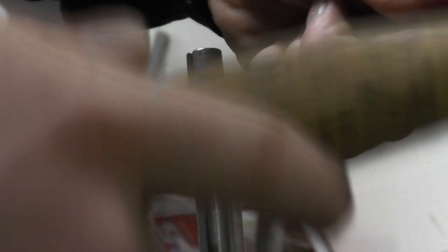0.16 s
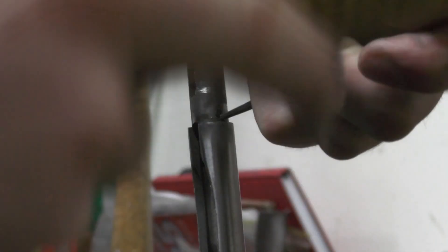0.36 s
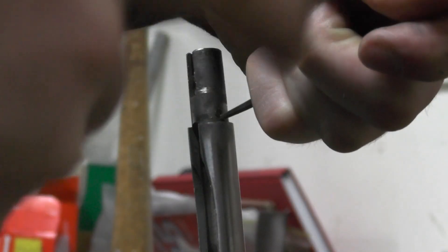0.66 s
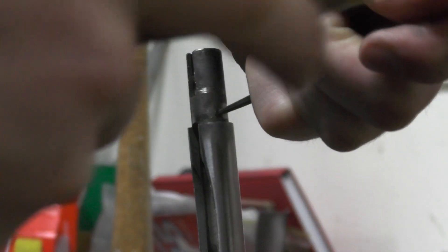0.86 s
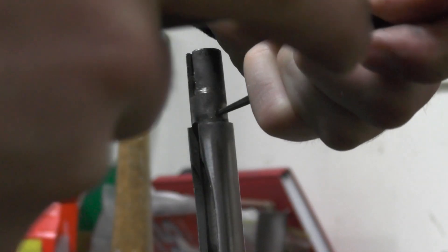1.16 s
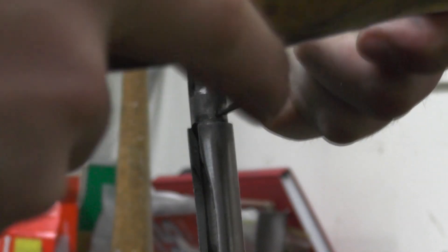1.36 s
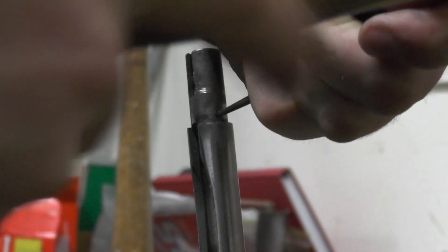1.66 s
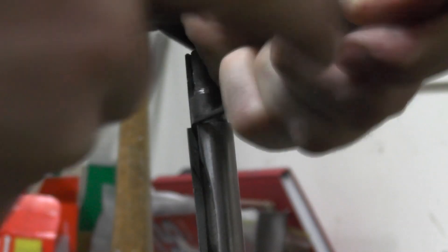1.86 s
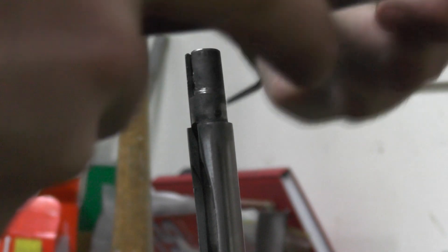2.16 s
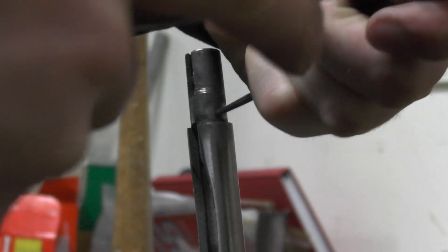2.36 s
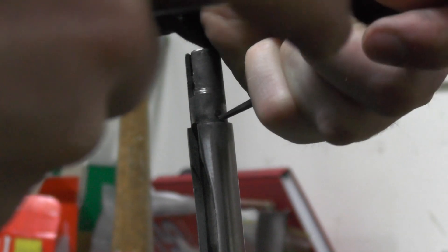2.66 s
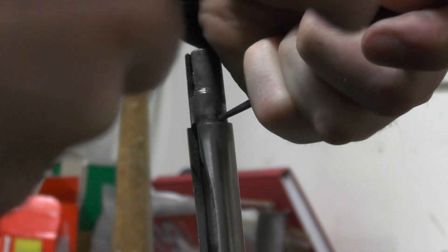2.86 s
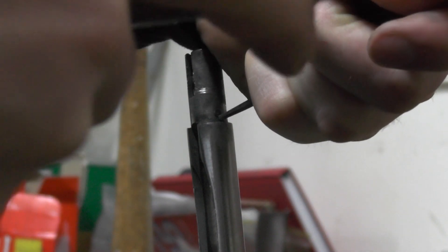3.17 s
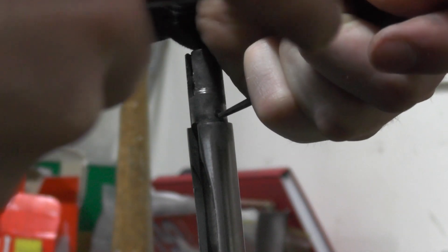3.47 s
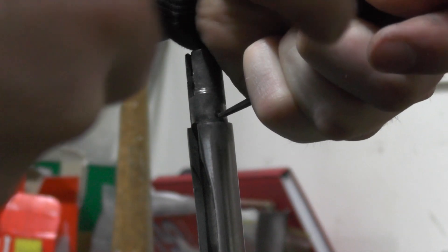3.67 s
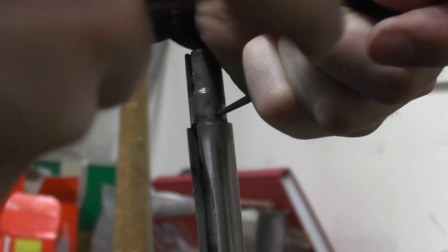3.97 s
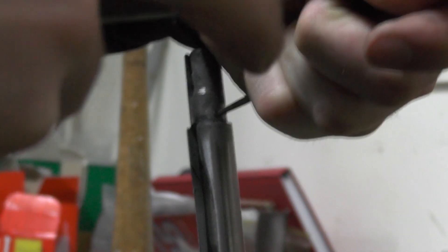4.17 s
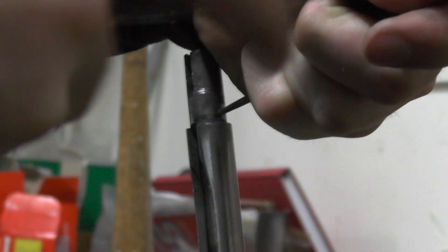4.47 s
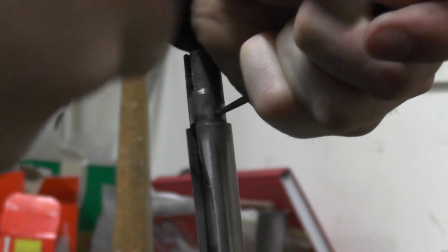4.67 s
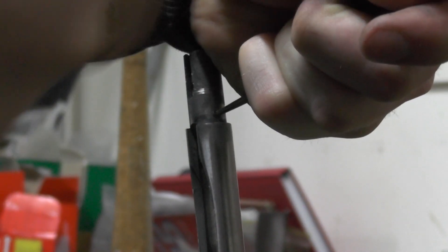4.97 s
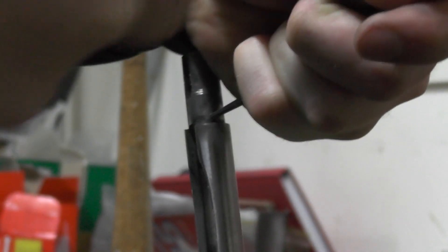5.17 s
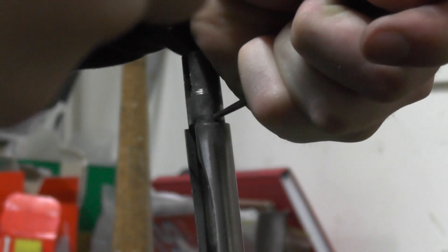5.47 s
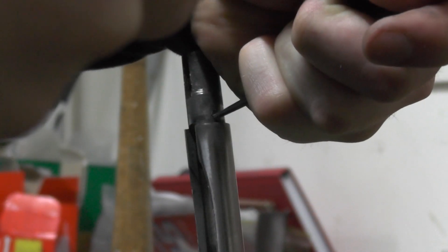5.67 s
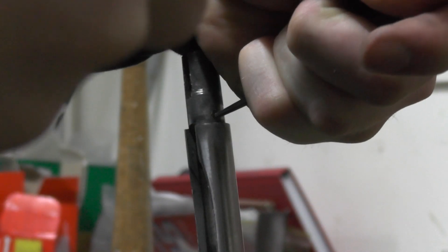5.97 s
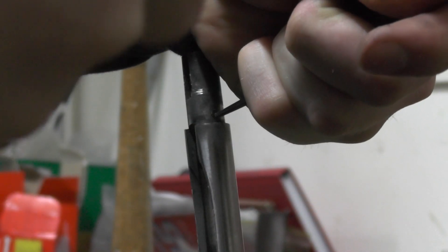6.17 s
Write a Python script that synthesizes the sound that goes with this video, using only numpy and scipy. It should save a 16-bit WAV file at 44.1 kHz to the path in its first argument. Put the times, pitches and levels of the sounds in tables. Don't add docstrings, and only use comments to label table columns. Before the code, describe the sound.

In a small workshop, a loose steel tool chatters and rings thinly on the bench before being gripped silent. Three hammer blows on a punch follow, each a bright crack with dull bench thump and clinking rebounds. Wood squeaks and knocks in a pause, then four more blows land, the last glancing. A close camera microphone also catches low machine drone, rumble and hiss.

```python
import sys
import numpy as np
from scipy import signal
from scipy.fft import rfft, irfft
from scipy.io import wavfile
from scipy.ndimage import uniform_filter1d

SR = 44100
rng = np.random.default_rng(int(sys.argv[2]) if len(sys.argv) > 2 else 0)


def transcribe(u):
    v = np.clip(np.atleast_2d(u).T, -1, 1)
    q = np.round(v * 32767).astype(np.int16)
    wavfile.write(sys.argv[1], SR, q)


def gain_from_db(level_db):
    decades = np.asarray(level_db, float) / 20
    return 10 ** decades


N = 278712


def evened(x):
    return x / np.sqrt(np.mean(x ** 2) + 1e-20)


def smoothed(x, size):
    return uniform_filter1d(x, size=size)


def read(points, hz, column=1):
    rows = np.transpose(points)
    return np.interp(np.log(hz + 1), np.log(rows[0] + 1), rows[column])


def add(mix, s, sound):
    part = mix[..., round(s * SR):][..., :sound.shape[-1]]
    part += sound[..., :part.shape[-1]]


def coloured(x, points):
    hz = np.fft.rfftfreq(x.shape[-1], 1 / SR)
    return irfft(rfft(x) * gain_from_db(read(points, hz)), x.shape[-1])


def noise_burst(t):
    return rng.standard_normal((2, len(t)))


def ring(modes, t, phase):
    hz, db, t60 = np.reshape(modes, (-1, 3)).T[:, :, None]
    size = gain_from_db(db - 60 * t / t60) * (1 - np.exp(-t * hz * 1.3))
    return (size * np.sin(2 * np.pi * hz * t + phase)).sum(0)


def varied(modes, spread_db, detune):
    hz, db, t60 = np.transpose(modes)
    a, b = rng.standard_normal((2, len(hz)))
    return np.transpose([hz * (1 + detune * a), db + spread_db * b, t60])


def fuzzy(hz, width):
    f = np.fft.rfftfreq(N, 1 / SR)
    resonance = 1 / (1 + ((f - hz) / (width / 2)) ** 2)
    return evened(irfft(rfft(rng.standard_normal((2, N))) * resonance, N))


def ports(paths, table):
    hz = np.fft.rfftfreq(N, 1 / SR)
    db, turn, same = (read(table, hz, column=k) for k in range(1, 4))
    same = np.clip(same, 0, 1)
    right, other = rfft(paths)
    left = gain_from_db(db) * (same * np.exp(1j * turn) * right + np.sqrt(1 - same ** 2) * other)
    return np.array([irfft(left, N), paths[0]])


BLOW_TIMES = [
    .799,
    1.4342,
    1.7957,
    3.8716,
    4.2235,
    4.5688,
    5.0929,
]


def after_blows(t, fade_s):
    since = t - np.array(BLOW_TIMES)[:, None]
    return (np.exp(-np.maximum(since, 0) / fade_s) * (since > 0)).max(0)


# (start [s], end [s], level [dB], pitch [Hz])
MACHINE_SWELLS = [
    (0.062, 1.085, -52.5, 67.5),
    (1.403, 1.982, -56.5, 66.7),
    (2.2, 2.7, -60.5, 66.14),
    (2.8, 3.017, -62.5, 66.6),
    (3.116, 4.05, -57, 65.57),
    (4.443, 4.702, -58.5, 65.4),
    (4.676, 5.12, -51, 62.7),
    (5.448, 5.874, -59, 62.7),
    (6.0, 6.4, -67, 64.6),
]
SWELL_EDGE_S, IDLE_DB = 0.088, -71.5


def drone(t):
    start, end, db, hz = np.transpose(MACHINE_SWELLS)[:, :, None]
    shape = np.clip(np.minimum(t - start, end - t) / SWELL_EDGE_S, 0, 1)
    middle = (start + end) / 2
    wander_hz = 0.56 * evened(smoothed(rng.standard_normal(N), 9000))
    pitch_hz = np.interp(t, middle[:, 0], hz[:, 0]) + wander_hz
    size = gain_from_db(IDLE_DB) + (gain_from_db(db) * shape).max(0)
    return gain_from_db(3.5) * size * np.sin(2 * np.pi * np.cumsum(pitch_hz) / SR)


# (frequency [Hz], density [dB per Hz])
AIR_SPECTRUM = [(12, -72.5), (20, -27), (48, -9), (65, -6), (134, -8), (163, -19.5), (277, -17),
                (542, -20.5), (802, -23.5), (1290, -28), (1570, -25.5), (1810, -42.5), (2910, -23.5),
                (5230, -39.5), (16000, -29)]
# (frequency [Hz], width [Hz], level [dB])
MACHINE_ORDERS = [(66.6, 9, -13.5), (106, 12, -10), (124, 22, -8), (195.7, 12, -11)]
# (frequency [Hz], width [Hz], level [dB])
CAMERA_WHIR = [(1566, 310, -69), (2010, 130, -73.5), (3170, 3100, -65.5)]
# (frequency [Hz], level [dB])
BUZZ_LINES = [(1373, -86), (1523, -86.5), (1577, -77), (1723, -92), (1927, -83), (2945, -84.5), (3025, -82),
              (3176, -83), (3225, -86), (3273, -91), (3575, -85.5), (4576, -88), (4732, -91)]
DUCK_DB, DUCK_RECOVER_S, STAY_DB = -3.5, 0.14, -3.5
BOOM_DB, BOOM_S = 6, 0.18


def room():
    t = np.arange(N) / SR
    air = evened(coloured(rng.standard_normal((2, N)), AIR_SPECTRUM))
    air = coloured(air, [(15900, 0), (16100, -50)])
    low = coloured(air, [(900, -2.0), (2500, -38.0)])
    deep = coloured(air, [(140, -17.5), (220, -42.0)])
    hiss = air - low
    gain = gain_from_db(DUCK_DB * after_blows(t, DUCK_RECOVER_S) + STAY_DB * (t > BLOW_TIMES[-1]))
    boom = gain_from_db(BOOM_DB * after_blows(t, BOOM_S))
    out = gain_from_db(-55) * (hiss * gain + deep + (low - deep) * gain * boom)
    out += gain_from_db(-61) * sum(gain_from_db(db) * fuzzy(hz, width) for hz, width, db in MACHINE_ORDERS)
    out += drone(t)
    out += gain * sum(gain_from_db(db) * fuzzy(hz, width) for hz, width, db in CAMERA_WHIR)
    return out + gain * sum(gain_from_db(db + 4.5) * fuzzy(hz, 6.3) for hz, db in BUZZ_LINES)


# (start [s], end [s], level [dB], pitch [Hz], width [Hz])
NARROW_NOISES = [
    (0, 0.16, -61, 1200, 120),
    (1.89, 2.02, -51.5, 1290, 130),
    (2.021, 2.13, -57, 1360, 99),
    (2.36, 2.434, -58, 1280, 170),
    (2.535, 2.632, -58, 1180, 220),
    (2.345, 2.41, -59, 700, 270),
    (0, .78, -66, 720, 440),
    (3.68, 3.87, -60, 550, 250),
    (5.2, 5.6, -63, 530, 500),
    (5.5, 6, -67, 325, 250),
]


def narrow_noises():
    out = np.zeros((2, N))
    for start, end, db, hz, width in NARROW_NOISES:
        count = round((end - start) * SR)
        squeak = fuzzy(hz, width)[:, :count] * signal.windows.tukey(count, .4)
        add(out, max(start, 0), gain_from_db(db) * squeak)
    return out


# (time [s], peak level [dB], pitch [Hz], t60 [s], dull share [0-1])
WOOD_KNOCKS = [(0.0005, -51, 1234, 0.2, 0.18), (0.0465, -43, 1330, 0.05, 0.2),
               (0.0557, -46, 1307, 0.05, 0.15), (0.1157, -57, 1220, 0.05, 0.5),
               (0.1278, -51, 1360, 0.05, 0.3), (1.8885, -35, 1270, 0.07, 0.1),
               (1.9035, -41, 1420, 0.04, 0.1), (1.916, -37, 1280, 0.06, 0.1), (1.937, -37, 1290, 0.09, 0.1),
               (1.997, -51, 1360, 0.06, 0), (2.0305, -43.5, 1240, 0.1, 0.1), (2.046, -47, 1220, 0.06, 0.1),
               (2.0724, -48, 1330, 0.05, 0), (2.082, -47, 1360, 0.05, 0), (2.105, -51, 1400, 0.06, 0),
               (2.1665, -49, 950, 0.014, 0.9), (2.3405, -40, 1000, 0.06, 0.7),
               (2.342, -35, 1300, 0.05, 0.11), (2.35, -39, 1290, 0.06, 0.1), (2.358, -44, 1300, 0.1, 0.1),
               (2.5535, -47, 1270, 0.04, 0.02), (2.564, -52, 1250, 0.04, 0), (2.582, -53, 1020, 0.06, 0.4),
               (3.1476, -59, 1300, 0.06, 0.5), (3.3274, -54, 1300, 0.05, 0.08)]
WOOD_PARTNERS = (1.08, .9)


def knocks():
    t, out = np.arange(8000) / SR, np.zeros((2, N))
    for s, db, hz, t60, dull in WOOD_KNOCKS:
        noise, slips = rng.standard_normal((2, 2, len(t)))
        upper, lower = WOOD_PARTNERS
        modes = [(hz, 0, .06), (hz * upper, -5, .04), (hz * lower, -7, .04)]
        slips = slips * gain_from_db(-60 * t / t60)
        slips[:, 0] = 16
        creak = signal.fftconvolve(slips, ring(modes, t[:3000], 0)[None], axes=1)[:, :len(t)]
        creak = creak * (1 - np.exp(-t / 0.00067))
        puff = evened(coloured(noise, [(250, -36), (600, 7.5), (1400, -2), (2000, -20), (4000, -14.5), (6000, -36)]))
        puff = np.clip(dull, 0, 1) * puff * gain_from_db(-60 * t / (1.8 * t60))
        add(out, s, gain_from_db(db + 3.5) * (creak / abs(creak).max() + puff))
    return out


# (drift [dB per s], edge-on dip [dB], jolt at first blow [dB])
TOOL_CARRY = [
    (21, 3.5, -3),
    (-6.5, -14.5, 0),
    (-70.5, -7, 1),
]
TURN_S, TURN_WIDTH_S = 0.831, 0.084
GRIP_S, GRIP_DB_PER_S = 1.125, -110


def carried(t, last_s, drift_db, dip_db, jolt_db):
    drift = drift_db * np.maximum(t - last_s, 0)
    turn = dip_db * np.exp(-((t - TURN_S) / TURN_WIDTH_S) ** 2)
    grip = GRIP_DB_PER_S * np.maximum(t - GRIP_S, 0)
    return drift + turn + jolt_db * (t > BLOW_TIMES[0]) + grip


# (pitch [Hz], partner offset [Hz], partner level [dB], t60 between touches [s])
TOOL_MODES = [(2259, 22, -15, 1.5), (5606, 17, -20, 1.2), (9921, 26, -2, .5)]
# (time [s], click level [dB], ring level of low, middle, high mode afterwards [dB])
TOOL_TOUCHES = [(0.1907, -41.5, -45, -37.5, -54.5), (0.2171, -43, -35.5, -33.5, -58),
                (0.238, -58, -36.5, -38.5, -54.5), (0.2549, -49.5, -39, -34, -50),
                (0.271, -54, -47, -39.5, -63), (0.2808, -52.5, -56, -34, -63),
                (0.3012, -48, -45, -27.5, -60), (0.33, -46, -42.5, -27.5, -59),
                (0.3847, -45, -47, -37.5, -53), (0.4045, -54, -51, -41, -57),
                (0.445, -46.5, -48, -30, -50.5)]
# (pitch [Hz], level [dB], t60 [s])
TOUCH_ANSWER = [(3610, 2.5, 0.016), (4400, -6, 0.01), (2920, -10, .012)]
# (frequency [Hz], level [dB])
CLICK_SPECTRUM = [(600, -10.5), (1500, -3.5), (2700, -5), (3600, -6.5), (4600, -13), (5600, 7.5),
                  (7000, -8.5), (8000, -24), (12000, -33), (14000, -44)]
BEAT_LAG_S = .0135
CLICK_LAG_S = .003


def loose_tool():
    t = np.arange(round(1.4 * SR)) / SR
    s, click_db, *level_db = np.transpose(TOOL_TOUCHES)
    last = np.maximum(np.searchsorted(s, t) - 1, 0)
    out = np.zeros((2, N))
    for k, (hz, offset_hz, partner_db, t60) in enumerate(TOOL_MODES):
        ring_db = level_db[k][last] - 60 * (t - s[last]) / t60
        size = gain_from_db(ring_db + carried(t, s[-1], *TOOL_CARRY[k])) * (t > s[0])
        size = uniform_filter1d(size, size=300, origin=149)
        main = np.sin(2 * np.pi * hz * t)
        partner = np.sin(2 * np.pi * (hz * t + offset_hz * (t - BEAT_LAG_S)))
        partner_size = gain_from_db(partner_db - 170 * np.maximum(t - s[-2], 0))
        add(out, 0, gain_from_db(4.5) * size * (main + partner_size * partner))
    u = t[:4000]
    for at, db in zip(s, click_db):
        grit = evened(smoothed(rng.standard_normal(len(u)), 70))
        tick = evened(coloured(noise_burst(u), CLICK_SPECTRUM))
        fade = gain_from_db(-60 * u / 0.021) + gain_from_db(-9.5 - 60 * u / 0.32 + 4.6 * grit)
        add(out, at + CLICK_LAG_S, gain_from_db(db + 3) * ring(varied(TOUCH_ANSWER, 2.8, 0.037), u, 0))
        add(out, at + CLICK_LAG_S, gain_from_db(db + 7) * tick * fade)
    return out


# (time [s], level [dB], pitch [Hz], t60 [s])
CLINKS = [(0.7987, -19, 4270, 0.02), (0.8024, -17.5, 7340, 0.015), (0.8087, -22.5, 1980, 0.027),
          (0.8109, -31.5, 11910, 0.02), (0.8114, -23, 3340, 0.02), (0.8147, -22.5, 2900, 0.018),
          (0.8287, -38, 9400, 0.02), (1.4348, -18, 7030, 0.023), (1.4347, -3.5, 4700, 0.0086),
          (1.4424, -13.5, 3720, 0.024), (1.4427, -8, 2710, 0.015), (1.4447, -22, 14400, 0.02),
          (1.4527, -39, 11390, 0.02), (1.4639, -21, 1950, 0.02), (1.7956, -13.5, 4610, 0.015),
          (1.7988, -13, 7110, 0.018), (1.803, -18.5, 3040, 0.02), (1.8072, -19, 3270, 0.024),
          (1.8082, -18, 2540, 0.025), (1.8103, -27, 10700, 0.022), (1.8194, -35, 10400, 0.022),
          (3.871, -22.5, 3640, 0.017), (3.8737, -15, 7340, 0.0202), (3.88, -18, 3680, 0.015),
          (3.88, -21, 3270, 0.02), (3.8834, -19, 1830, 0.041), (3.8875, -33, 10420, 0.02),
          (3.8915, -37.5, 10400, 0.02), (4.2266, -15, 7110, 0.02), (4.2317, -27, 3640, 0.015),
          (4.2328, -12, 2865, 0.025), (4.2359, -18.5, 2530, 0.024), (4.2345, -26, 11580, 0.02),
          (4.2375, -18, 3770, 0.01957), (4.2408, -30, 11950, 0.02), (4.5738, -27.5, 7800, 0.014),
          (4.5776, -15, 3740, 0.02), (4.578, -27, 10650, 0.016), (4.5817, -15, 3870, 0.015),
          (4.5822, -15, 2960, 0.018), (4.584, -20.5, 2400, 0.0198), (4.5968, -28, 10470, 0.02),
          (5.0931, -27, 7800, 0.018), (5.0933, -18, 3490, 0.016), (5.1019, -17.5, 3230, 0.025),
          (5.1021, -26, 10800, 0.018), (5.1029, -22, 3730, 0.016), (5.111, -17, 2650, 0.02),
          (5.1193, -27, 10800, 0.02)]


def clinks():
    t, out = np.arange(4000) / SR, np.zeros((2, N))
    for s, db, hz, t60 in CLINKS:
        pair = [(hz, db, t60), (hz * rng.uniform(1.04, 1.12), db + 1.5, 0.57 * t60)]
        clink = np.array([ring(pair, t, rng.uniform(0, 2 * np.pi, (2, 1))) for path in out])
        add(out, s, clink * (1 - np.exp(-t / 0.0004)))
    return out


# (frequency [Hz], level [dB])
BODY_SPECTRUM = [(18, -41), (30, -17), (113, -20), (185, -11.5), (230, -7), (300, -10.5), (526, -10),
                 (686, -7), (995, -15.5), (1330, -7.5), (2150, -18.5), (2330, -14.5), (3750, -18),
                 (6370, -24), (10800, -25), (15300, -26.5), (16000, -46.5), (17000, -66.5)]
# (frequency [Hz], rise [ms], first t60 [s], room t60 [s], room level [dB], lumpiness [dB])
BODY_FADE = [(49.7, 13.5, 0.3, 1.9, -8, 11), (186.5, 17, 0.38, 0.54, -7.5, 10),
             (500, 1, 0.23, 0.86, -18, -11), (1020, 1.7, 0.19, 0.55, -17.5, 4.5),
             (3520, 0.53, 0.2, 0.41, -16.5, 3), (7700, .8, 0.051, 0.21, -3, 4),
             (14800, 2.1, 0.077, .2, -14, 10)]
CLUMP_DB = 1.1
PATCH_DB, PATCH_FROM_HZ = 2.5, 900


def dense(noise, lumps, t, bright_db):
    hz = np.fft.rfftfreq(len(t), 1 / SR)
    z = rfft(evened(coloured(noise, BODY_SPECTRUM)))
    clumps = evened(smoothed(smoothed(rfft(noise[1]).real, 200), 200))
    tilt_db = bright_db * np.log2((hz + 200) / 1500) / 3
    z = z * gain_from_db(tilt_db + CLUMP_DB * clumps * (hz > 900))
    centres = np.geomspace(40, 16000, num=16)
    out = 0
    for k, f in enumerate(centres):
        share = np.interp(np.log(hz + 1), np.log(centres), np.arange(len(centres)) == k)
        band = irfft(z * share, len(t))
        rise_ms, first, late, room_db, lump_db = (read(BODY_FADE, f, column=c) for c in range(1, 6))
        patch = evened(smoothed(smoothed(np.roll(noise[1], 997 * k), 120), 120))
        band = band * gain_from_db(PATCH_DB * np.clip(patch, -2, 2) * (f > PATCH_FROM_HZ))
        rise = 1 - np.exp(-(t * 1000 / rise_ms) ** 2)
        direct = gain_from_db(lump_db * lumps - 60 * t / first)
        out = out + band * rise * (direct + gain_from_db(room_db - 60 * t / late))
    return out


LANDING_MODES = [228, 275, 335, 452, 559, 684]
LANDING_LEVELS = [(-3, 1, 2.5, -8.5, 0.5, 1), (-5, -3.5, 1.5, 9.5, 5, -2), (-4, 4, -1, 1.5, 2, -2),
                  (2.5, 3.5, 1.5, 1, -3.5, -5.5), (-9, 2, -2, 10, 3, -3.5), (-5, 3, -3.5, -1.5, 3, -1.5),
                  (4, -6.5, -15, 2, -6, -0.5)]


def landed(modes, k):
    shift = dict(zip(LANDING_MODES, LANDING_LEVELS[k]))
    woken = [(hz, db + shift.get(hz, 0), t60) for hz, db, t60 in modes]
    return varied(woken, .5, .005)


# (strength [dB], then against a usual blow: bench thump [dB], steel clatter [dB], brightness [dB])
BLOW_LEVELS = [
    (-8, 0.5, -5, -2.5),
    (-7.5, 1, 2, 0),
    (-5.5, -1.5, -4, 1),
    (-8, 0, 5.5, -2),
    (-8, 1.5, 6, 1),
    (-6, 0, 3, 0.5),
    (-7, -9, -6.5, 2),
]
# (frequency [Hz], level [dB], t60 [s])
BENCH_MODES = [(181, -6, .13), (335, -6, .06), (386, -8, .07), (452, -2, .033), (559, -1, .026),
               (684, -6, .1), (752, -18, .084)]
# (frequency [Hz], level [dB], t60 [s])
BENCH_OPPOSED = [(169, -14, .083), (228, -3, .04), (275, -13, .19)]
# (frequency [Hz], level [dB], t60 [s])
VICE_MODES = [(110.6, -23.5, 0.24), (1190, -38, 0.12), (1300, -14, 0.051), (1379, -12, 0.097),
              (1474, -16, 0.075), (1752, -19, 0.16)]
VICE_FIRST_DB, VICE_DB_PER_BLOW = 1.2, -0.12
VICE_WITH_THUMP = 0.63
# (frequency [Hz], level [dB], t60 [s])
STEEL_MODES = [(1887, -17, 0.07), (2475, -13, 0.12), (2676, -6, 0.06), (2940, -6, 0.055), (3250, -6, .025),
               (3747, -3, 0.025), (3705, -2, 0.025), (4730, -4, 0.0063), (5500, -18, 0.04),
               (7050, -7, 0.02), (7900, -14, .03), (10500, -17, 0.067), (14900, -10, 0.014)]
CONTACT_MS = [0, 8.5, 12.5, 21]
CONTACT_DB = [-3, 0.5, -6.5, -13.5]
# (time [s], pitch [Hz])
SHANK_STARTS = [(.8, 492), (1.436, 4583), (1.436, 488), (1.436, 10480), (1.436, 690), (3.873, 455),
                (3.879, 3700), (4.225, 4587), (4.225, 590), (4.232, 3810), (4.225, 560), (4.585, 4587),
                (4.571, 590), (5.094, 4587), (5.094, 2390), (5.098, 10480), (5.094, 180), (5.094, 1600),
                (5.101, 3300), (5.094, 520)]
# (level [dB], t60 [s])
SHANK_RINGS = [(-35, 0.78), (-47, 0.49), (-41, 0.76), (-32, .08), (-24, 0.064), (-16, 0.12), (-23.5, 0.037),
               (-32, 0.35), (-34, 0.56), (-15.5, 0.068), (-19.5, 0.11), (-30, 0.33), (-44, 1), (-38.5, 0.4),
               (-27, 0.23), (-26.5, 0.14), (-19, 0.23), (-16.5, 0.077), (-22, 0.019), (-27, 0.13)]
FINGERS_S, FINGERS_DB_PER_S = .135, -220
# (time [s], level [dB], spread [ms])
STEEL_CRACKS = [
    (.8012, -5, .4),
    (1.4350, -15, .35),
    (1.7962, -15, .5),
    (1.7990, -13, .6),
    (3.8734, -8, .45),
    (4.2248, -16, .5),
    (4.2268, -16, .5),
    (4.5724, -17, .4),
    (5.0933, -12, .3),
    (1.9335, -45, 2),
]
# (frequency [Hz], level [dB])
SPIT_SPECTRUM = [(2500, -28.5), (5000, -2), (7500, -5.5), (9500, -2.5), (15000, 1), (16300, -3.5),
                 (16800, -61)]


def blows():
    t, out = np.arange(2 ** 15) / SR, np.zeros((2, N))
    habit = noise_burst(t)
    for k, (s, levels) in enumerate(zip(BLOW_TIMES, BLOW_LEVELS)):
        db, thump_db, clatter_db, bright_db = levels
        fresh = rng.standard_normal((3, len(t)))
        lumps = np.clip(evened(smoothed(fresh[2], 40)), -1.6, 1.6)
        lumps = lumps * np.exp(-t / 0.026) * (1 - np.exp(-t / 0.0025))
        body = gain_from_db(-9) * dense(0.56 * habit + 0.85 * fresh[:2], lumps, t, bright_db)

        thump = ring(landed(BENCH_MODES, k), t, 0) - ring(landed(BENCH_OPPOSED, k), t, 0)
        thump = gain_from_db(thump_db) * thump * (1 - np.exp(-(t / .0017) ** 2))

        kicks = np.zeros(len(t))
        contact_ms = CONTACT_MS + rng.uniform(0, 1.5, len(CONTACT_MS))
        kicks[np.int_(contact_ms * SR / 1000)] = gain_from_db(CONTACT_DB)
        modes = varied(STEEL_MODES, 3, .006)
        steel = np.array([ring(modes, t, rng.uniform(0, 2 * np.pi, (len(modes), 1))) for path in out])
        steel = gain_from_db(clatter_db - 18.5) * signal.fftconvolve(steel, kicks[None], axes=1)[:, :len(t)]

        vice_db = VICE_FIRST_DB + VICE_DB_PER_BLOW * k + VICE_WITH_THUMP * thump_db
        vice = gain_from_db(vice_db) * ring(varied(VICE_MODES, 1.1, 0.0094), t, 0)
        add(out, s, gain_from_db(db) * (body + thump + vice + steel))
    for (s, hz), (db, t60) in zip(SHANK_STARTS, SHANK_RINGS):
        held = abs(hz - 4585) < 50
        stilled = gain_from_db(FINGERS_DB_PER_S * np.maximum(t - FINGERS_S, 0) * held)
        swell = 1 - np.exp(-t / (0.052 * t60))
        add(out, s, stilled * ring((hz, db, t60), t, 0) * swell)
    t = t[:600]
    peak_s = .0022
    for s, db, spread_ms in STEEL_CRACKS:
        spit = evened(coloured(noise_burst(t), SPIT_SPECTRUM))
        add(out, s - peak_s, gain_from_db(db) * spit * np.exp(-abs(t - peak_s) * 1000 / spread_ms))
    return out


# (time [s], peak level [dB], t60 [s])
CLOTH_RUSTLES = [
    (1.933, -38.5, 0.044),
    (2.03, -48, 0.56),
    (2.1, -52.5, 0.94),
    (5.287, -47.5, 0.13),
    (5.354, -48.5, 0.12),
    (4.8, -55, 0.73),
]
# (frequency [Hz], level [dB])
RUSTLE_SPECTRUM = [(150, -27), (500, 5), (2000, -4), (6000, -6.5), (12000, -40), (17000, -35)]


def rustles():
    t, out = np.arange(20000) / SR, np.zeros((2, N))
    for s, db, t60 in CLOTH_RUSTLES:
        noise = evened(coloured(noise_burst(t), RUSTLE_SPECTRUM))
        add(out, s, gain_from_db(db - 60 * t / t60) * (1 - np.exp(-t / (0.034 * t60))) * noise)
    return out


# (frequency [Hz], level [dB], phase [rad], likeness [0-1])
NEAR_SHADOW = [(46, -4.5, .2, .94), (144, -4.2, -.6, .97), (255, -8, -1.2, .95), (450, -13.5, -1.6, .78),
               (600, -16.5, -1.3, .7), (800, -15.5, -.6, .3), (1400, -15.5, 0, .62), (3300, -15, .2, .58),
               (5900, -12.5, .8, .35), (7800, -7, 1, .62), (9500, -4.5, .1, .78), (13900, -3.8, 0, .93)]
# (frequency [Hz], level [dB], phase [rad], likeness [0-1])
ROOM_SHADOW = [(60, -2.5, .1, 1), (200, -2.5, -.6, .78), (450, -4, -1.9, .33), (800, -6, -1.1, .15),
               (1400, -11, -.3, .45), (2500, -14, .3, .43), (3300, -15, .4, .45), (5900, -12, 1, .3),
               (7800, -4, .8, .22), (10400, -9, 0, .68), (14000, -9, 0, .8)]
TOOL_LEFT_DB = 1


def scene():
    tool = ports(loose_tool(), NEAR_SHADOW) * gain_from_db([[TOOL_LEFT_DB], [0]])
    bench = ports(blows() + clinks() + knocks() + narrow_noises() + rustles(), NEAR_SHADOW)
    return bench + tool + ports(room(), ROOM_SHADOW)


MASK_DB, MASK_FROM_HZ = 30, 4300
FALL_ABOVE, FALL_BELOW = .3, 0.97
BLUR_DB = -42.5


def masked(x):
    hz, t, z = signal.stft(x, SR, nperseg=1024)
    power = (abs(z) ** 2).mean(0)
    level = smoothed_level = uniform_filter1d(10 * np.log10(power + 1e-14), size=3, axis=1)
    bins = np.arange(len(hz))[:, None]
    treble = hz[:, None] > MASK_FROM_HZ
    fall = FALL_ABOVE * bins
    above = np.maximum.accumulate((level + fall) * treble - 999 * ~treble, axis=0) - fall
    fall = FALL_BELOW * bins
    below = np.maximum.accumulate((level - fall)[::-1], axis=0)[::-1] + fall - 999 * ~treble
    shadow = np.maximum(above, below)
    local = 10 * np.log10(uniform_filter1d(power, size=9, axis=0) + 1e-14)
    keep = 1 / (1 + gain_from_db(8.9 * np.clip(shadow - MASK_DB - local, -40, 40)))
    z = z + gain_from_db(BLUR_DB) * abs(z) * np.exp(2j * np.pi * rng.random(z.shape))
    return signal.istft(z * keep, SR, nperseg=1024)[1][:, :N]


def low_pass(x):
    return signal.sosfilt(signal.butter(12, 17160, fs=SR, output="sos"), x)


def record(dry):
    x = masked(0.93 * np.tanh(dry / 0.9))
    lowpass = signal.firwin(301, 16700, window=("kaiser", 9), fs=SR)
    x = signal.oaconvolve(x, lowpass[None], "same")
    return low_pass(x)


dry = scene()
out = record(dry)
transcribe(out)
```